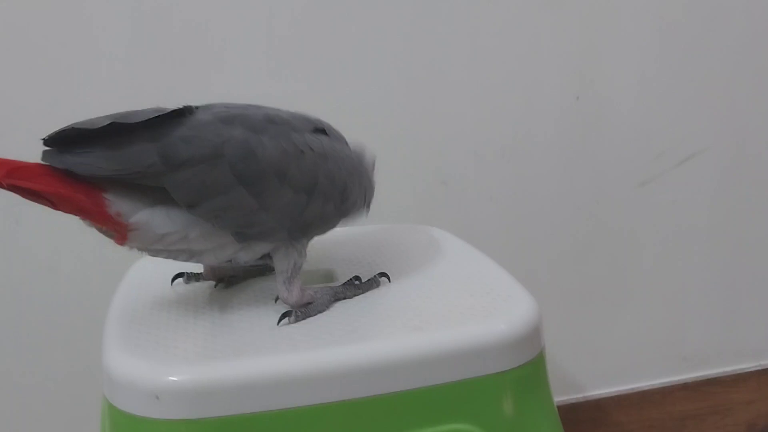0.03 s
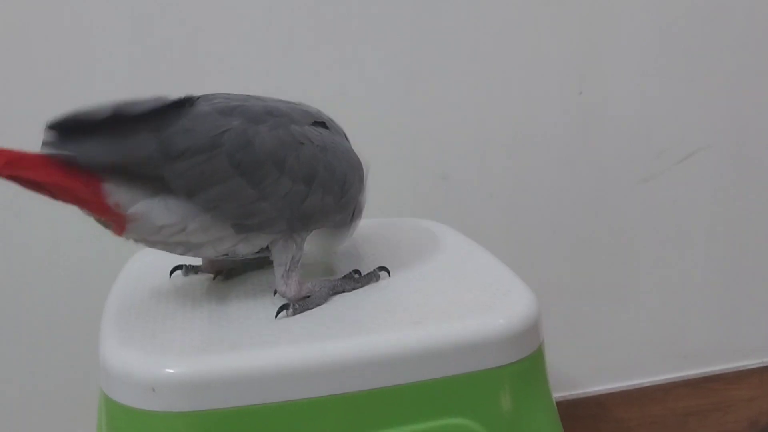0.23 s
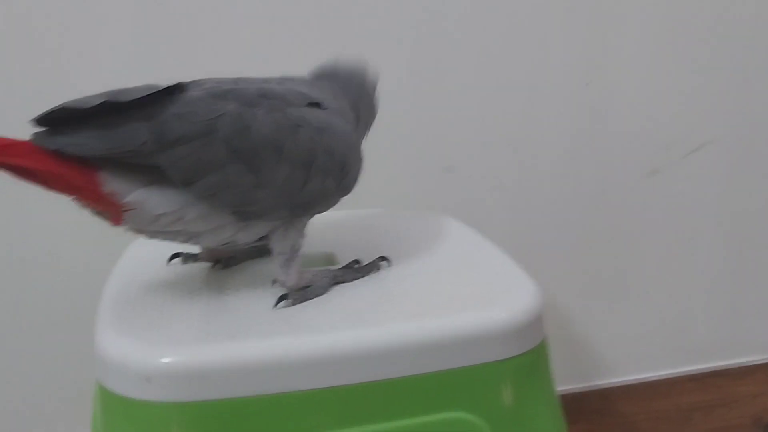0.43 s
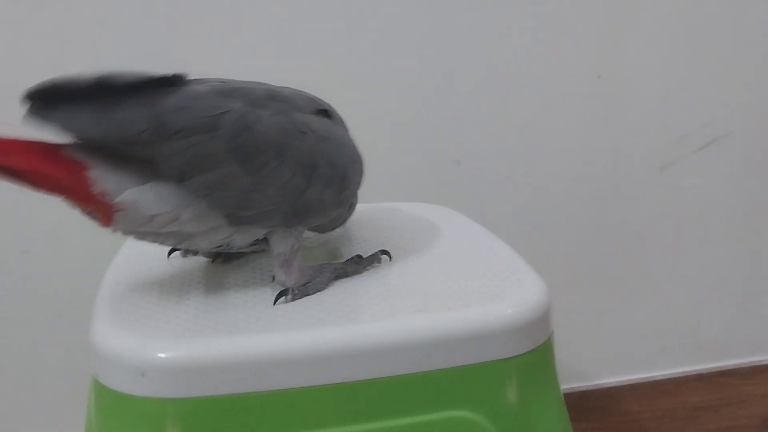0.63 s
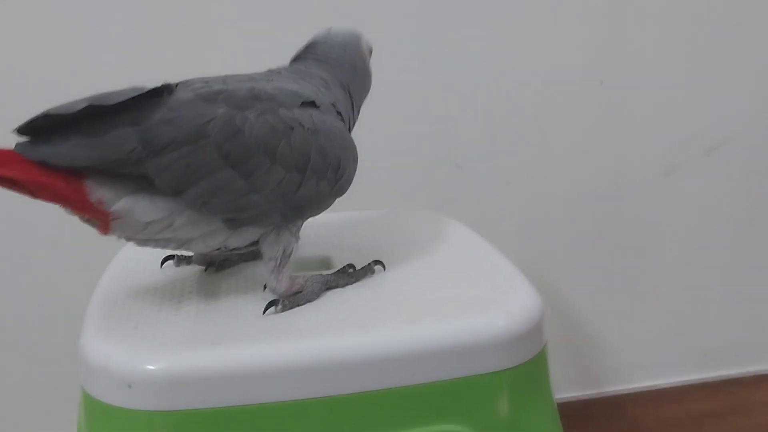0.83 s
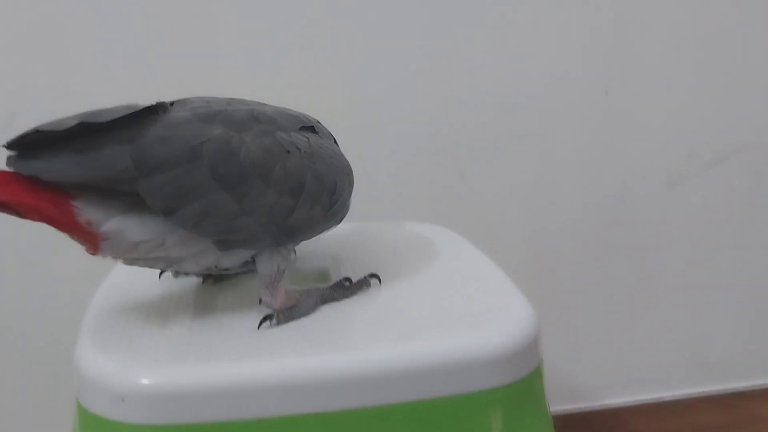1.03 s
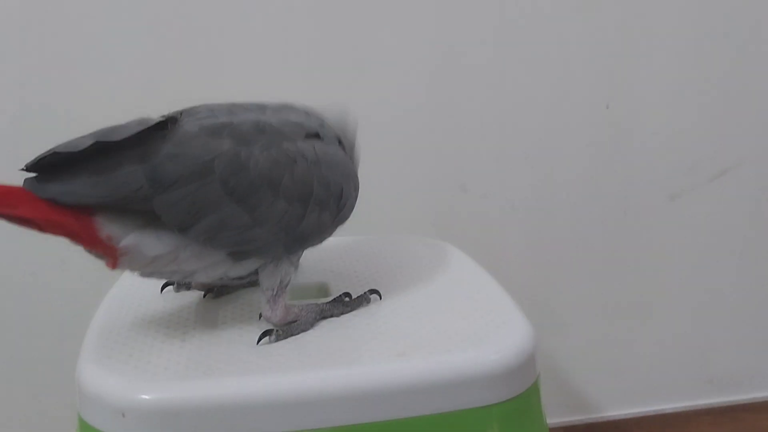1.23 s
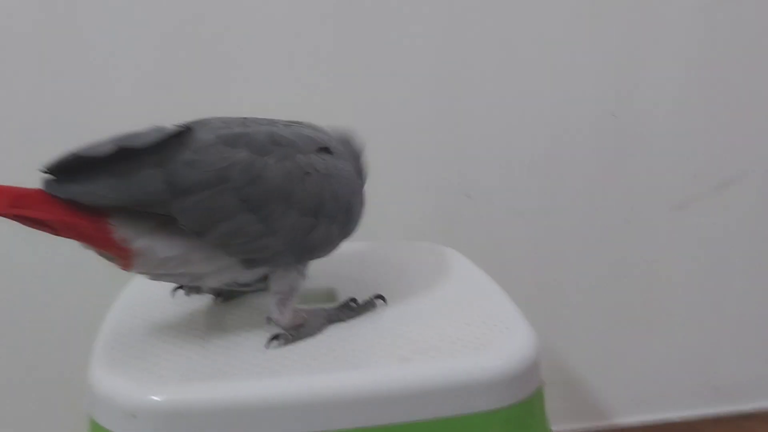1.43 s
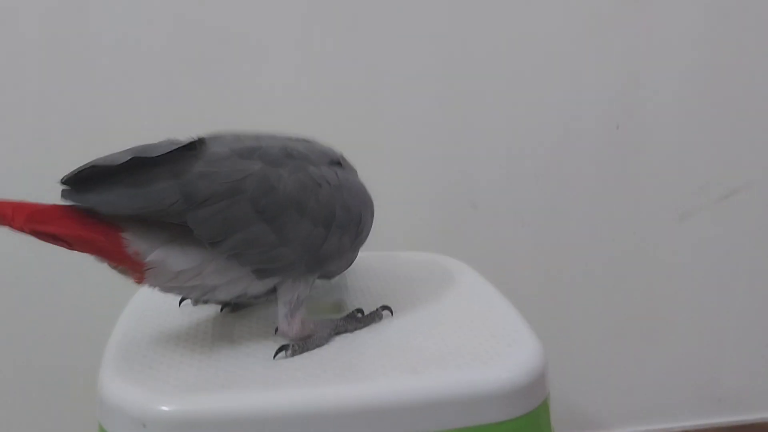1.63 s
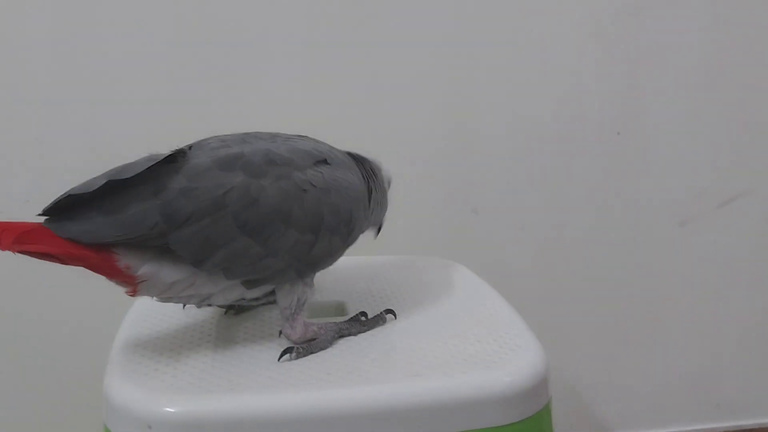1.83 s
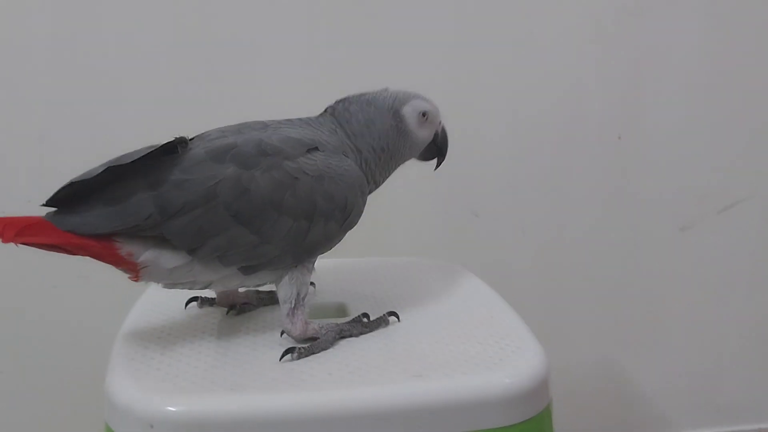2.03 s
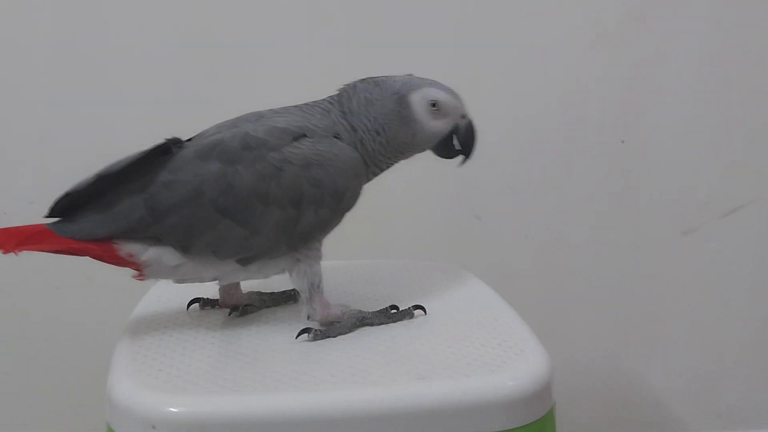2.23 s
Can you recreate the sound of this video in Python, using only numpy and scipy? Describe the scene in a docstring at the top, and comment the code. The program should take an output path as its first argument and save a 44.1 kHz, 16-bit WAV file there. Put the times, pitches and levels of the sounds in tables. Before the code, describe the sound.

Parrot beak knocks on a hollow plastic stool, five sharp blows evenly spaced, the last ones softer, each with boomy room echo; then faint claw ticks and near silence, close microphone in a small bare room.

```python
"""A parrot knocks its beak on a hollow plastic stool in a small bare room, about three blows a second.
Each blow is a burst of noise for the crack, dying sines for the seat and the low room modes,
and fading noise for the diffuse echo. Faint claw ticks and soft steps are short noise bursts;
steady coloured noise is the air. The sound sets in during the echo of an earlier blow."""
import sys
import numpy as np
from scipy import signal
from scipy.io import wavfile

SR = 44100
rng = np.random.default_rng(int(sys.argv[2]) if len(sys.argv) > 2 else 0)


def gain_from_db(level_db):
    """Turn a decibel level (scalar or array-like) into a linear amplitude factor."""
    decades = np.asarray(level_db, float) / 20
    return 10 ** decades


def master(y):
    """Save y as 16-bit WAV."""
    cut = np.clip(np.atleast_2d(y).T, -1, 1)
    pcm = np.round(cut * 32767)  # scale
    wavfile.write(sys.argv[1], SR, pcm.astype(np.int16))


N = 101429  # samples in the whole scene

# In all tables, t60 is the time to fade by 60 dB; pan is left minus right.
# Noise colours set only the balance of pitches; loudness is set apart.

# Colour of the room's air: f/Hz, level per hertz/dB
AIR_COLOUR = [(18, -37), (30, -17.5), (165, 4), (252, -11.5), (584, -19), (913, -23), (2060, -24),
              (2750, -28.5), (12300, -23), (16000, -26.5)]
# Soft steps on the seat: t/s, level/dB, t60/s
STEPS = [(2.2665, -59, 0.071), (2.281, -58, 0.57)]
# Colour of a soft step: f/Hz, level/dB
STEP_COLOUR = [(100, -22.5), (200, 5), (350, -1), (450, 8), (600, -4), (900, -9), (1250, -30), (1600, -25),
               (3000, -34), (16000, -55)]
# Claw ticks: t/s, level/dB, t60/s, pan/dB
CLAW_TICKS = [(.2463, -74, 0.15, -11.5), (0.6098, -60, 0.17, 0), (0.9074, -70, 0.1, -8),
              (0.989, -57.5, 0.046, -3.5), (1.087, -58, 0.035, 3), (2.0712, -71.5, 0.16, -0.5),
              (2.104, -78.5, .4, 2), (2.209, -73.5, .2, -1), (2.252, -74, 0.21, -2.5),
              (2.2796, -68, 0.064, 2.5)]
# Colour of a claw tick: f/Hz, level/dB
TICK_COLOUR = [(300, -35), (1900, -2), (3000, -14.5), (5200, -1), (7300, -5), (8500, -18), (12000, -11.5),
               (16000, -15)]
# Colour of the diffuse echo: f/Hz, level per hertz/dB
ECHO_COLOUR = [(30, -24), (60, -30), (85, -37.5), (110, -29.5), (170, -7), (300, -12.5), (450, -9),
               (700, -13.5), (1000, -20.5), (1250, -20.5), (1500, -25), (2000, -24.5), (2500, -33),
               (3200, -38), (4000, -33), (5000, -33.5), (6500, -39.5), (7600, -44), (8600, -51.5),
               (10500, -48), (12500, -47), (15500, -51.5)]
# How long the echo lasts before the extra sinking: f/Hz, t60/s
ECHO_FADE = [(60, 0.56), (160, 0.99), (420, 0.5), (800, 0.53), (1150, 0.54), (1900, 0.52), (2900, 0.44),
             (5500, 0.39), (9000, 0.31), (14000, .3)]
# How alike left and right are in the echo, air, ticks and steps: f/Hz, likeness/0-1
ROOM_LIKENESS = [(60, 1), (300, 0.72), (600, 0.32), (900, 0.1), (1500, 0.033), (16000, 0.024)]
# Balance of the echo and the air: f/Hz, pan/dB
ROOM_PAN = [(60, -3), (500, -3.5), (1200, 0.1), (3000, -5.5), (6000, -3), (9000, 1.1), (14000, -4)]
# Extra sinking of echo and low modes after each blow: t after the blow/s, level/dB
SINKING = [(0, -0.5), (.195, -0.7), (.225, -4), (.27, -5.5), (.3, -6), (.4, -11.5), (.55, -20)]
# How much of that sinking each low mode takes: f/Hz, share
SINKING_SHARE = [(110, 3.3), (170, 2.9), (230, 1), (290, 1.88), (360, 0.92), (500, 1.5), (900, 0.64)]
# Long low modes of the room and the hollow stool: f/Hz
LOW_MODE_HZ = [113, 135, 170, 202, 231.5, 258, 287, 332, 361.5, 398, 447, 490, 516, 571, 674, 690, 711, 804,
               835, 932, 990, 1120]
# Ring of each of those modes, before the extra sinking: level/dB, t60/s, pan/dB
LOW_MODE_RING = [(-16.5, 0.66, 0), (-15, .4, -4), (-2, 0.81, -4.5), (-4, 0.45, 2), (-1.5, 0.61, -1.5),
                 (0, 0.19, 1.5), (-2, 0.79, 0.1), (-10.5, 0.58, -1.5), (-12.5, 0.77, 2.5), (-10, .33, -2.5),
                 (-16, 0.13, -3), (-13.5, 0.76, 2.5), (-10.5, 0.19, 3), (-12, 0.13, 0), (-11.5, 0.46, -4),
                 (-17, .55, 1), (-9.5, 0.13, -5.5), (-31.5, 0.49, 2.5), (-24, .4, -5), (-16, 0.31, -0.5),
                 (-29, 0.82, 1.5), (-33, 0.34, -0.5)]
# Short modes of the seat: f/Hz, level struck mid-seat/dB, t60/s, change struck at the rim/dB
SEAT_MODES = [(228.4, 4.5, .08, 4), (308, 4.5, .03, 1), (468, -11.5, 0.057, 0.5), (694, -2.5, 0.062, -10),
              (875, -4, 0.057, 4), (1036, -10.5, .035, -5), (1060, -11, 0.021, -2), (1346, -5, 0.049, 4.5),
              (1550, -0.5, 0.044, -9), (1925, 0, 0.03, -1.5), (2060, -10, .035, 3.5)]
# Colour of the brittle beak crack, before each blow's tilt: f/Hz, level per hertz/dB
CRACK_COLOUR = [(500, -15.5), (1300, -11.5), (2000, -10.5), (2600, -7), (3400, -19), (4400, 2.5),
                (5300, 1.5), (6500, -5.5), (7500, -11), (8700, -23.5), (10500, -16), (12300, -14.5),
                (14500, -17.5), (16000, -32.5)]
# How alike left and right are in the crack: f/Hz, likeness/0-1
CRACK_LIKENESS = [(500, .8), (2000, .6), (16000, .5)]
# Early reflections of the crack: t/s, level/dB
REFLECTIONS = [(.0022, -1.5), (.0036, 0.5), (.0052, -4), (.0075, -3), (.0098, -14), (.013, -6.5),
               (.0175, -9.5), (.021, -17.5), (.027, -16.5)]
# Blows: t/s, low ring level/dB, seat level/dB, crack level/dB, echo level/dB, echo tilt/dB per octave
BLOWS = [(-.03, -19, -16, -22, -17.5, 0), (.315, -18, -19.5, -30.5, -20.5, 1.34),
         (.656, -18, -18.5, -26, -20.5, 0.8), (1.006, -19.5, -21, -29, -22, -0.26),
         (1.349, -20.5, -24.5, -33, -22, 1.3), (1.6963, -25.5, -26.5, -31, -26, 1.06)]
# Attack of each blow: nearness to the rim/0-1, crack tilt/dB per octave, crack t60/s
BLOW_ATTACKS = [(.1, .1, .015), (.1, 4.6, 0.029), (0.052, -0.5, 0.022), (.4, 0.8, 0.013), (.8, 0.9, 0.031),
                (.95, -3.5, 0.0092)]

TAIL = 40000  # samples of low ring and echo after each blow
SHORT = 8000  # samples of each crack, seat ring and claw tick
SPREAD_DB = 1.5  # random spread of mode levels from blow to blow


def read(points, hz):
    """Reads a table between its points, with pitch on a log scale."""
    f, value = np.transpose(points)
    return np.interp(np.log(hz + 1), np.log(f + 1), value)


def add(mix, s, sound):
    """Mixes a stereo sound in at time s; what falls outside the mix is left out."""
    at = round(s * SR)
    sound = sound[:, max(-at, 0):]
    part = mix[:, max(at, 0):][:, :sound.shape[1]]
    part += sound[:, :part.shape[1]]


def pan(db):
    """Gains for left and right, db being left minus right."""
    return gain_from_db(np.array([[.5], [-.5]]) * db)


def noise(size, colour, t60, same, pan_table):
    """Stereo noise from short spectra; each pitch fades with its t60, starting at level 1 before panning."""
    frames, hz = size // 128 + 5, np.fft.rfftfreq(512, 1 / SR)
    a, b, c, d = rng.standard_normal((frames, 257, 4)).T
    same = np.clip(read(same, hz), -1, 1)[:, None]
    left = a + 1j * b
    # the right side shares part of the left side's noise
    right = same * left + np.sqrt(1 - same ** 2) * (c + 1j * d)
    spectra = np.array([left, right]) * gain_from_db(colour(hz))[:, None]
    steady = signal.istft(spectra[0], nperseg=512, noverlap=384)[1]
    level = np.sqrt(np.mean(steady ** 2))
    fade = gain_from_db(-60 * np.arange(frames) * 128 / SR / t60(hz)[:, None])
    spectra *= pan(read(pan_table, hz))[:, :, None] * fade
    return signal.istft(spectra, nperseg=512, noverlap=384)[1][:, :size] / level


def burst(size, colour, same, db, t60, rise_s, pan_db):
    """Coloured noise that rises in a straight line and fades alike at all pitches."""
    t = np.arange(size) / SR
    sound = noise(size, lambda hz: read(colour, hz), lambda hz: 0 * hz + 100, same, [(1, 0), (2, 0.021)])
    return pan(pan_db) * gain_from_db(db - 60 * t / t60) * sound * np.minimum(t / rise_s, 1)


def ring(modes, t, spread_db, shift):
    """Dying sines, one row per mode, with random spread of level (dB) and pitch (share of it)."""
    hz, db, t60 = np.transpose(modes)[:3, :, None]
    a, b = rng.standard_normal((2, len(modes), 1))
    t = np.maximum(t, 0)
    level = gain_from_db(db + spread_db * a - 60 * t / np.maximum(t60, .002))
    return level * np.sin(2 * np.pi * hz * (1 + shift * b) * t)


def room_air():
    """The quiet air of the room is coloured noise that practically never fades."""
    air_db = -76
    sound = noise(N, lambda hz: read(AIR_COLOUR, hz), lambda hz: 0 * hz + 1e6, ROOM_LIKENESS, ROOM_PAN)
    return gain_from_db(air_db) * sound


def soft_step(db, t60):
    """A soft step on the seat is a noise burst, a little stronger on the right."""
    return burst(4000, STEP_COLOUR, ROOM_LIKENESS, db, t60, 0.00183, -1.7)


def claw_tick(db, t60, pan_db):
    """A claw tick is a faint burst of noise that rises in about a millisecond."""
    return burst(SHORT, TICK_COLOUR, ROOM_LIKENESS, db, t60, 0.00094, pan_db)


def diffuse_echo(t, sink_db, echo_db, tilt_db):
    """Sound scattered around the room becomes noise that fades at its own pace for each pitch."""
    bass_hz, bass_db, rise_s = 260, -6.5, 0.0066
    echo = noise(TAIL, lambda hz: read(ECHO_COLOUR, hz) + tilt_db * np.log2(1 + hz / 1000),
                 lambda hz: read(ECHO_FADE, hz), ROOM_LIKENESS, ROOM_PAN)
    # turn the echo's bass down, leaving more of it to the low modes
    bass = signal.sosfiltfilt(signal.butter(3, bass_hz, fs=SR, output="sos"), echo)
    echo = echo - (1 - gain_from_db(bass_db)) * bass
    return gain_from_db(echo_db + sink_db) * echo * (1 - np.exp(-t / rise_s))


def low_modes(t, sink_db, low_db):
    """The room and the hollow stool ring on at fixed low pitches, as dying sines."""
    lag_s, rise_s = 0.0016, 0.0012
    late = np.maximum(t - lag_s, 0)
    hz = np.array(LOW_MODE_HZ)
    db, t60, pan_db = np.transpose(LOW_MODE_RING)
    sign = np.where(hz == 258, -1, 1)  # one mode starts with a pull, the rest with a push
    rings = ring(np.transpose([hz, db, t60]), late, SPREAD_DB, 0)
    rings = rings * gain_from_db(read(SINKING_SHARE, hz)[:, None] * sink_db)
    low = (pan(pan_db) * sign) @ rings  # sum of all modes for each side
    return gain_from_db(low_db) * low * (1 - np.exp(-late / rise_s))


def seat_ring(seat_db, rim):
    """The plastic seat rings briefly; the struck spot changes the strength of its modes.
    Their pitch varies a little at random."""
    start_s, rise_s, left_lag_s = .0008, 0.0019, .0001  # the seat answers just after the crack
    pitch_shift, pan_db = .03, -0.8
    t = np.arange(SHORT) / SR
    modes = [(f, db + rim * rim_db, t60) for f, db, t60, rim_db in SEAT_MODES]
    one_side = ring(modes, t - start_s, SPREAD_DB, pitch_shift).sum(0)
    seat = np.array([one_side] * 2) * (1 - np.exp(-t / rise_s))
    seat[0] = np.interp(t - left_lag_s, t, seat[0])  # the left side hears it later
    return pan(pan_db) * gain_from_db(seat_db) * seat


def beak_crack(crack_db, tilt_db, t60):
    """The beak's hard contact gives a dense noise burst, repeated by early reflections."""
    left_lag_s, pan_db = .0004, -0.5
    colour = [(f, db + tilt_db * np.log2(f / 4000)) for f, db in CRACK_COLOUR]
    crack = burst(SHORT, colour, CRACK_LIKENESS, crack_db, t60, 0.00011, 0)
    taps = np.zeros((2, 1500))
    taps[0, round(left_lag_s * SR)] = taps[1, 0] = 1  # the right side hears the crack first
    for s, db in REFLECTIONS:
        # each side gets its own small random delay; both share a random sign
        at = round(s * SR) + rng.integers(0, 25, 2)
        taps[[0, 1], at] = gain_from_db(db) * rng.choice([-1, 1])
    return pan(pan_db) * signal.fftconvolve(crack, taps, axes=1)


def knock(low_db, seat_db, crack_db, echo_db, echo_tilt_db, rim, crack_tilt_db, crack_t60):
    """One blow cracks, rings the seat and sets the low modes and the echo going."""
    t = np.arange(TAIL) / SR
    sink_db = np.interp(t, *np.transpose(SINKING))
    blow = low_modes(t, sink_db, low_db) + diffuse_echo(t, sink_db, echo_db, echo_tilt_db)
    add(blow, 0, beak_crack(crack_db, crack_tilt_db, crack_t60))
    add(blow, 0, seat_ring(seat_db, rim))
    return blow


def scene():
    """Steps, ticks and blows over the quiet air of the room."""
    mix = room_air()
    for s, db, t60 in STEPS:
        add(mix, s, soft_step(db, t60))
    for s, db, t60, pan_db in CLAW_TICKS:
        add(mix, s, claw_tick(db, t60, pan_db))
    for (s, *blow), attack in zip(BLOWS, BLOW_ATTACKS):
        add(mix, s, knock(*blow, *attack))
    return mix


def low_pass(x):
    """Removes everything above the highest recorded frequency."""
    return signal.sosfilt(signal.butter(12, 16820, fs=SR, output="sos"), x)


def record(dry):
    """The microphone trims the lowest and highest pitches; silence lasts until the sound sets in."""
    low_cut_hz, top_hz = 110, 16000
    start_s, rise_s = .0688, 0.0015
    cut = signal.sosfilt(signal.butter(2, low_cut_hz, "high", fs=SR, output="sos"), dry)
    cut = signal.sosfilt(signal.butter(6, top_hz, fs=SR, output="sos"), cut)
    gate = np.clip((np.arange(N) / SR - start_s) / rise_s, 0, 1)
    return low_pass(cut * gate)


dry = scene()
out = record(dry)
master(out)
```